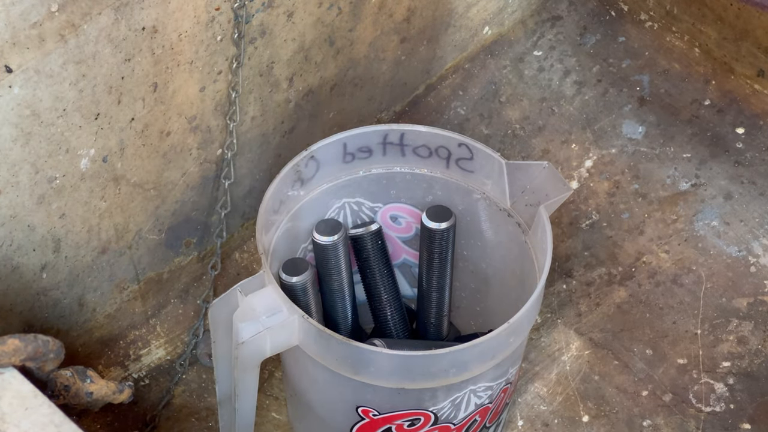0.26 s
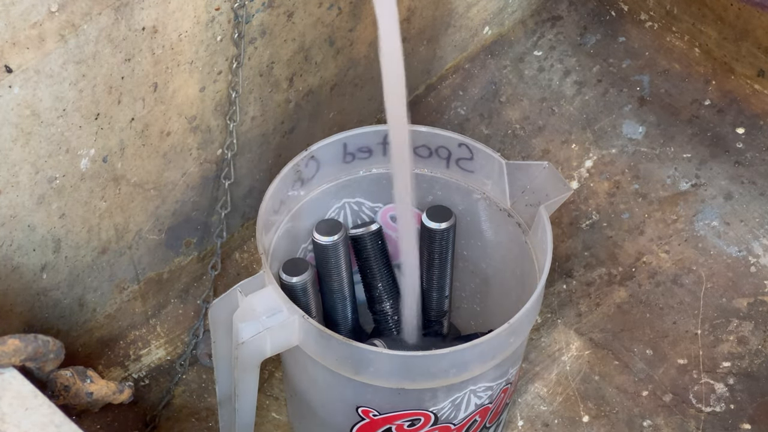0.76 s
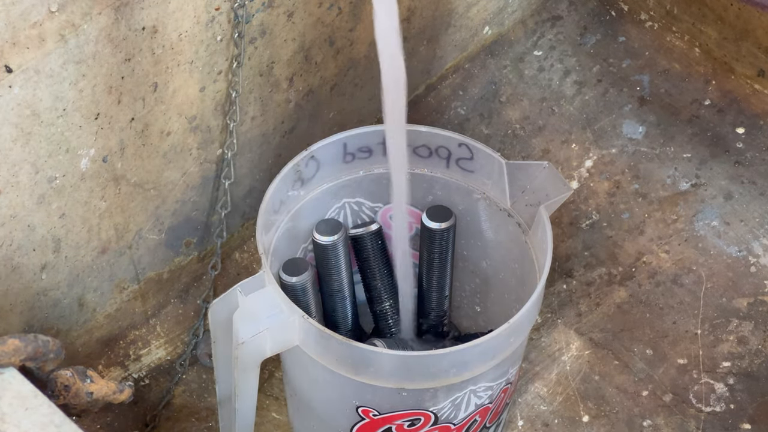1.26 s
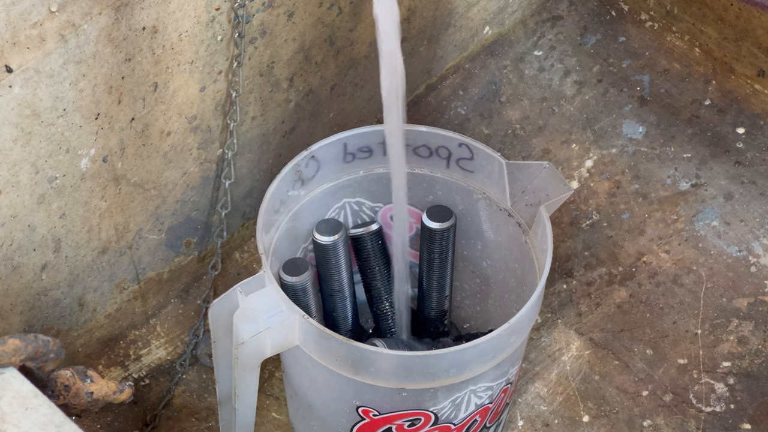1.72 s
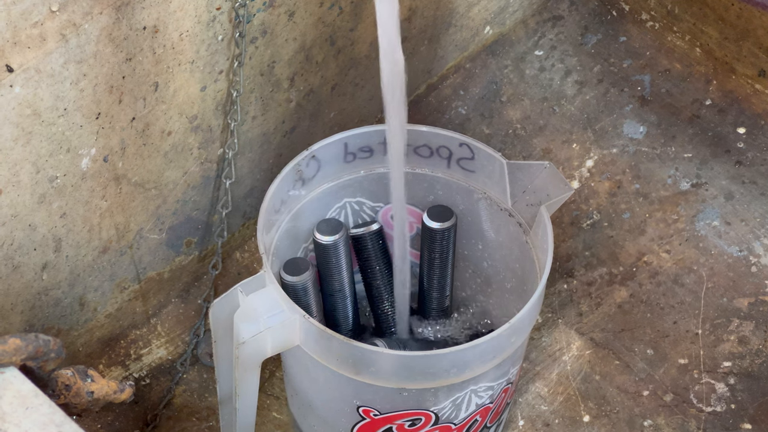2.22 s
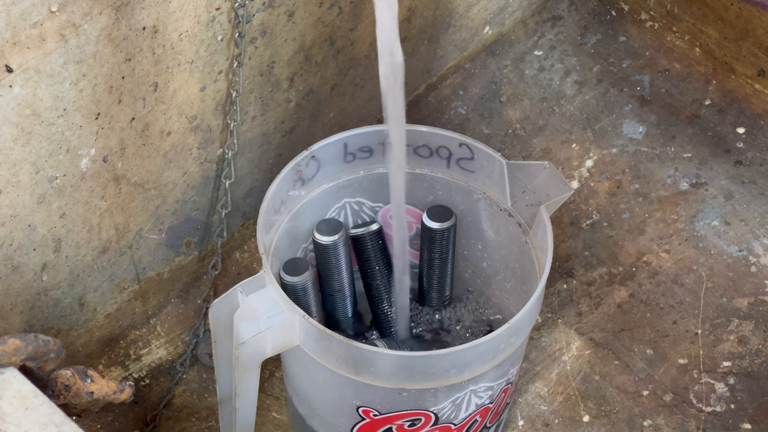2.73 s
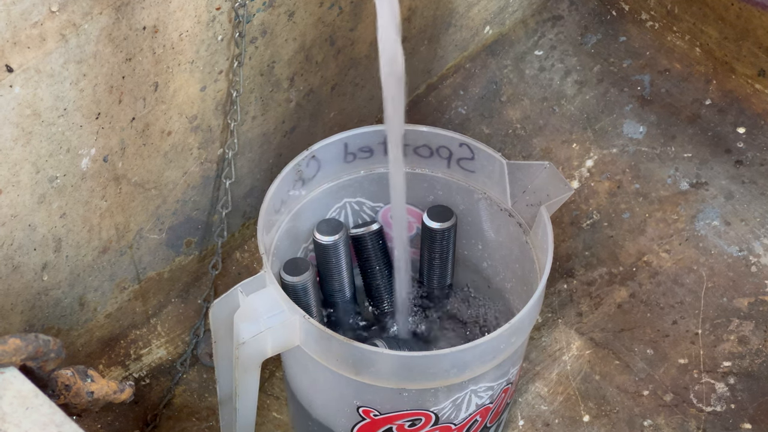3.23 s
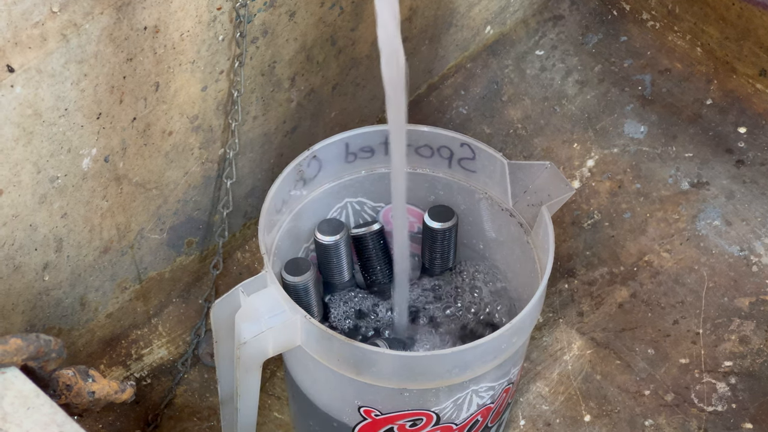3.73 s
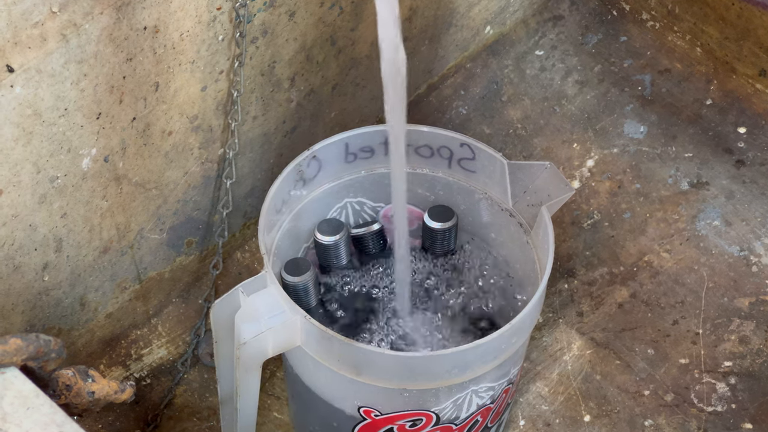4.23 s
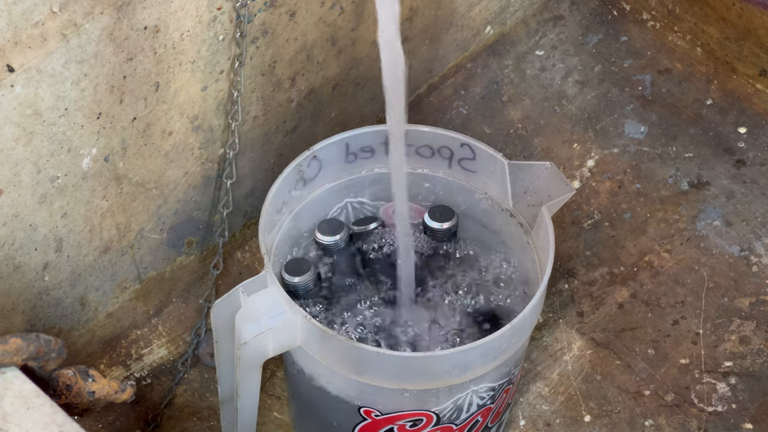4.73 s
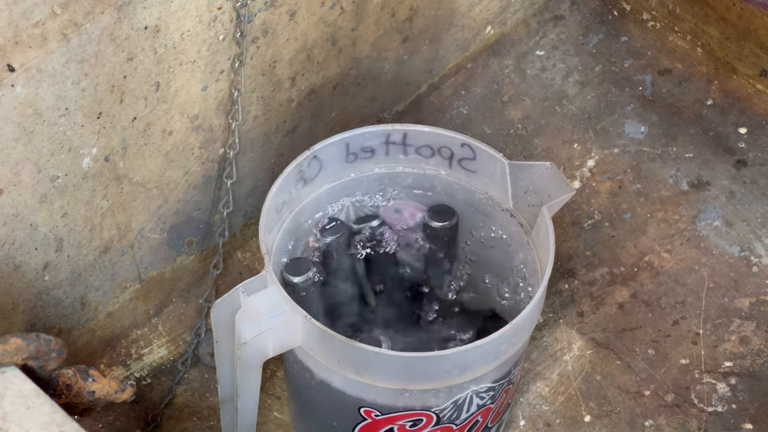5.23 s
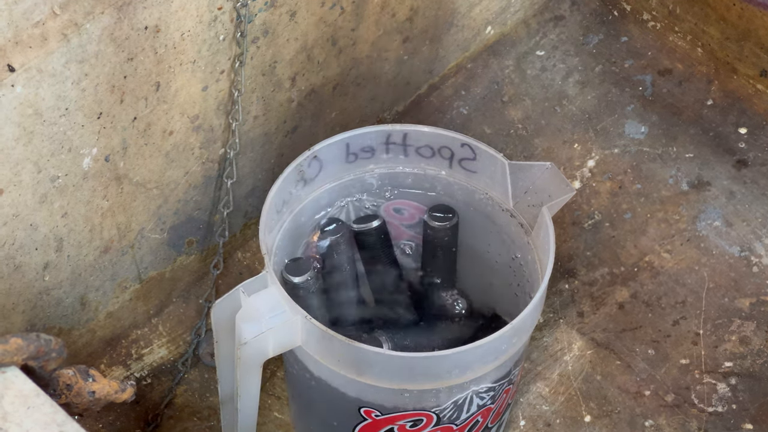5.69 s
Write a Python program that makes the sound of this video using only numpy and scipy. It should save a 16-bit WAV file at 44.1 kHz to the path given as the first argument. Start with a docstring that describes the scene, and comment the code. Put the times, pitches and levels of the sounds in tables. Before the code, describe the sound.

Quiet room noise and a faint low hum sit underneath throughout. A light rustle and soft low pipe thuds come first, at 0.1 and 0.2 s. At about 0.26 s air squeals through the valve, jumping up then sliding down around 2 to 2.7 kHz, chopped by arriving water; wet sputtering coughs follow until about 0.75 s. A thin aerated jet hisses and spatters on studs and plastic until nearly 2 s, with a low pipe rumble and a few plinks. Then a smooth stream takes over, shallow and bright at first, deepening around 2.8 s into gulping, bubbling, hollow pitcher resonance that swells, with small splashes near 3.5 to 3.8 s and a surge at 4.87 s. At 5.04 s the tap shuts with a ringing knock; the water dies quickly, with tiny drips until 5.2 s. Soft rustles, ticks and dull handling bumps follow, strongest around 5.9 s. Close mono microphone, little deep bass.

```python
"""A faint rustle and soft thuds in the pipe come first, as a tap opens over a plastic pitcher of steel studs.
Trapped air squeals and sputters out (tones and noise), then an aerated jet hisses on the bottom.
A smooth stream follows: drop impacts and tiny bubbles, passed through the resonances of the pitcher.
The tap shuts with a knock, a click that rings the pipe. Last drips, a few rustles and dull
handling bumps follow, over quiet room noise and a faint hum."""
import sys
import numpy as np
from scipy import signal
from scipy.fft import rfft, irfft, next_fast_len
from scipy.io import wavfile
from scipy.ndimage import uniform_filter1d

SR = 44100
rng = np.random.default_rng(int(sys.argv[2]) if len(sys.argv) > 2 else 0)


def dump(signal):
    """Clip the signal to [-1, 1] and save it as 16-bit WAV at the path in sys.argv[1]."""
    limited = np.clip(np.atleast_2d(signal).T, -1, 1)
    pcm = np.round(limited * 32767).astype(np.int16)
    wavfile.write(sys.argv[1], SR, pcm)


N = 262836
TIME = np.arange(N) / SR   # seconds


def from_db(db):
    """Turn decibels into a gain."""
    return 10 ** (np.asarray(db) / 20)


def rms_one(x):
    """Scale a sound to an rms (average strength) of 1."""
    return x / np.sqrt(np.mean(x ** 2) + 1e-20)


def in_time(rows):
    """Draw straight lines between the rows of a curve, giving each column at every sample."""
    s, *columns = np.transpose(rows)
    return [np.interp(TIME, s, c) for c in columns]


def between(start, stop, fade):
    """A gate that opens and closes with soft ends."""
    opening = np.clip((TIME - start) / fade, 0, 1)
    closing = np.clip((stop - TIME) / fade, 0, 1)
    return opening * closing


def passing(s, width_s):
    """A smooth step from 0 to 1 around a moment."""
    return .5 + .5 * np.tanh((TIME - s) / width_s)


def dying(age, t60):
    """Exponential decay that falls by 60 dB in t60 seconds."""
    return np.exp(-np.log(1000) * age / t60)


def fading(start, t60):
    """Full level until a moment, then an exponential decay."""
    return dying(np.maximum(TIME - start, 0), t60)


def since(s):
    """Sample numbers and ages in seconds for the quarter second after a moment."""
    at = np.arange(round(s * SR), min(N, round(s * SR) + SR // 4))
    return at, (at - at[0]) / SR


def bursts(rows, rise):
    """Envelope of quick swells that die away; overlapping ones add in power."""
    power = np.zeros(N)
    for s, db, t60 in rows:
        at, age = since(s)
        swell = 1 - np.exp(-age / rise)
        power[at] += (from_db(db) * swell * dying(age, t60)) ** 2
    return np.sqrt(power)


def drift(rate):
    """Slow random wandering with a spread of 1; rate is in Hz."""
    r = np.exp(-2 * np.pi * rate / SR)
    noise = rng.standard_normal(N + SR)
    return rms_one(signal.lfilter([1], [1, -2 * r, r * r], noise)[SR:])   # skip the first second to settle


def band(x, low_hz, high_hz):
    """Keep only the frequencies between two limits."""
    sos = signal.butter(3, [low_hz, min(high_hz, .49 * SR)], "band", fs=SR, output="sos")
    return signal.sosfilt(sos, x)


def zone(x, low_hz, high_hz):
    """One band of a sound, with its slow level held at 1."""
    x = band(x, low_hz, high_hz)
    slow_power = uniform_filter1d(x * x, SR // 5)
    return x / np.sqrt(slow_power + 1e-20)


def colour(x, spectrum):
    """Shape a sound to a spectrum with a minimum-phase filter (no pre-echo) of unit power gain."""
    size = next_fast_len(N + SR // 2) * 2
    hz, db = np.transpose(spectrum)
    log_hz = np.log(np.fft.rfftfreq(size, 1 / SR) + 1)
    gain = rms_one(from_db(np.interp(log_hz, np.log(hz), db)))
    # folding the cepstrum gives the phase that belongs to this gain
    cepstrum = irfft(np.log(gain))[:size // 2]
    cepstrum[1:] *= 2
    return irfft(rfft(x, size) * np.exp(rfft(cepstrum, size)))[:N]


def resound(x, peaks):
    """Each resonance lifts its own narrow band, or lowers it if the boost is negative."""
    for hz, width, db in peaks:
        narrow = signal.lfilter(*signal.iirpeak(hz, hz / width, fs=SR), x)
        x = x + (from_db(db) - 1) * narrow
    return x


def ring(clicks, hz, t60):
    """A unit click sets a sine of height 1 ringing, and it dies away."""
    r, w = from_db(-60 / (t60 * SR)), 2 * np.pi * hz / SR
    return signal.lfilter([0, np.sin(w)], [1, -2 * r * np.cos(w), r * r], clicks + 1e-18)


def pulses(rows, glide, swell):
    """Damped tones that swell over a share of a cycle and glide in pitch as they die."""
    out = np.zeros(N)
    for s, db, hz, t60 in rows:
        at, age = since(s)
        pitch = hz * (1 + glide * np.minimum(age / t60, 1))
        phase = 2 * np.pi * np.cumsum(pitch) / SR
        shape = (1 - np.exp(-age * hz / swell)) * dying(age, t60)
        out[at] += from_db(db) * shape / shape.max() * np.sin(phase)
    return out


def whistle(hz, width_hz, rough):
    """An unsteady tone: a steady core with narrow noise around it."""
    wobble = 1 + rough * (drift(width_hz) + 1j * drift(width_hz))
    turning = np.exp(2j * np.pi * np.cumsum(hz) / SR)
    return rms_one(np.real(wobble * turning))


def grains(per_s, spread_db):
    """Random impacts of uneven size."""
    sizes = from_db(spread_db * np.minimum(rng.exponential(1, N), 4)) * rng.choice([-1, 1], N)
    return rms_one(sizes * (rng.random(N) < per_s / SR))


def water(per_s, spread_db, cycles, bubble_db, count=28):
    """Drop impacts plus tiny ringing bubbles of many sizes, each ringing for a set number of cycles."""
    births = grains(per_s, spread_db)
    dealt = rng.integers(0, count, N)   # which bubble size each birth gets
    bubbles = 0
    for k, hz in enumerate(np.geomspace(400, 15000, count)):
        ringing = ring(births * (dealt == k), hz, cycles / hz)
        bubbles = bubbles + np.sqrt(hz) * rms_one(np.diff(ringing, prepend=0))
    return rms_one(grains(2 * per_s, spread_db) + from_db(bubble_db) * rms_one(bubbles))


def among_studs(x, echo_db, wander):
    """Three short reflections shift with the moving surface."""
    n, direct = np.arange(N), x
    for k, lag_s in enumerate([.0011, .0019, .0031]):
        delayed = np.interp(n - lag_s * SR * (1 + wander * drift(0.57)), n, direct)
        x = x + (-1) ** k * from_db(echo_db) * delayed
    return x


# Colour of the falling stream. Each row: frequency in Hz, relative level in dB.
POUR_SPECTRUM = [(150, -55), (250, -14.5), (436, -2), (557, 3), (816, -19.5), (1380, -3.5), (1550, 2),
                 (1760, -7), (2530, 0.5), (3460, 1.5), (4990, -4), (6140, -1.5), (9330, -4.5),
                 (13000, -2.5), (16000, 3)]
# Air resonances of the pitcher. Each row: frequency in Hz, width in Hz, boost in dB.
PITCHER_RESONANCES = [(399, 9.1, 12.5), (535, 77, 8.5), (909, 78, 15.5), (1572, 75, 8.5), (2260, 81, -4),
                      (3520, 250, 1.5), (4000, 210, 3), (4640, 53, 6.5), (5400, 230, 4.5), (6195, 310, 7),
                      (7050, 59, 10), (7910, 81, 7), (12500, 230, 4.5), (13660, 280, 8), (13500, 320, -10)]
# A thin layer of water holds few mid-sized bubbles. Each row: frequency in Hz, width in Hz, boost in dB.
SHALLOW_DIPS = [(1050, 500, -3), (3123, 2800, -14)]
# Voices of the smooth stream. Each row: low edge in Hz, high edge in Hz, level in shallow water in dB,
# gain in the pool in dB, rise with filling in dB per second, strength of the gulping in dB.
STREAM_VOICES = [(310, 680, -84, 7, 4.5, 2.5), (840, 2000, -73, 3, 2, 3.5),
                 (2300, 6780, -61.5, 4.5, 0.69, 2), (6650, 15100, -56, 3, -1.5, 0.24)]
POUR_START_S, POUR_STOP_S, POUR_T60_S = 1.95, 5.025, 0.32
COVERED_S = 2.5   # water covers the bottom
DEEP_S, DEEPEN_S = 2.85, 0.35   # around this moment the stream begins to plunge into a pool
# the water churns as it closes over the studs, this many gulps strong
SURGE_S, SURGE_HALF_S, SURGE_GULPS = 4.87, 0.063, 1.6


def pour():
    """The stream plunges in uneven gulps; its bubbles ring the pitcher, and all but the top voice grow."""
    pool = passing(DEEP_S, DEEPEN_S)
    depth = 0.18 + 0.87 * pool   # deeper water gulps and crackles more
    crackle = from_db(-5.0) * depth * water(1100, 3.1, cycles=24, bubble_db=1.5)
    drops = water(9000, 3.6, cycles=13.6, bubble_db=-2.0) + crackle
    sound = resound(colour(drops, POUR_SPECTRUM), PITCHER_RESONANCES)
    shallow = 1 - passing(COVERED_S, .05)
    sound = sound + shallow * (resound(sound, SHALLOW_DIPS) - sound)
    sound = among_studs(sound, echo_db=-19, wander=0.055)
    filled_s = np.clip(TIME, POUR_START_S, POUR_STOP_S) - POUR_START_S
    surge = SURGE_GULPS * np.exp(-((TIME - SURGE_S) / SURGE_HALF_S) ** 2)
    gulps = drift(45) * depth + surge
    voices = 0
    for low, high, db, pool_db, rise, gulp_db in STREAM_VOICES:
        level = from_db(db + pool_db * pool + rise * filled_s + gulp_db * gulps)
        voices = voices + level * zone(sound, low, high)
    return voices * passing(POUR_START_S, 0.011) * fading(POUR_STOP_S, POUR_T60_S)


# Water strikes a stud and throws drops. Each row: start in seconds, relative peak in dB, t60 in seconds.
STUD_SPLASHES = [(2.553, -41, .1), (2.775, -44, .04), (3.12, -43, .06), (3.52, -28, 0.051),
                 (3.635, -29, 0.11), (3.81, -28.5, 0.044), (4.012, -36, 0.048), (4.8264, -33, .04),
                 (4.8479, -35, 0.07), (5.0735, -14.5, 0.015), (5.085, -33.5, .015), (5.113, -34, 0.023)]


def splashes():
    """Now and then the stream strikes a stud and throws a cluster of drops."""
    drops = bursts(STUD_SPLASHES, rise=0.0017) * water(6000, 2.2, cycles=12, bubble_db=4)
    return from_db(-17) * resound(colour(drops, POUR_SPECTRUM), PITCHER_RESONANCES)


# Gaps between the studs resound in turn.
# Each row: middle in seconds, half length in seconds, frequency in Hz, boost in dB.
STUD_GAPS = [(.9, .13, 1830, 1.5), (1.365, 0.077, 3190, 8), (1.703, 0.45, 10850, 6.5),
             (1.856, 0.33, 2910, 7.5), (2.592, 0.077, 5400, 8.5), (3.1, .2, 2605, 14),
             (3.984, 0.26, 12900, 4), (4.03, 0.58, 11150, 4.5), (4.749, 0.19, 4800, 5),
             (4.87, .45, 3610, 6), (4.92, 0.22, 8550, 11.5)]
GAP_Q = 11   # sharpness: frequency divided by width


def through_gaps(x):
    """Each gap between the studs swells and fades as the water passes it."""
    for s, half_length, hz, db in STUD_GAPS:
        presence = np.exp(-((TIME - s) / half_length) ** 2)
        x = x + presence * (resound(x, [(hz, hz / GAP_Q, db)]) - x)
    return x


# Slugs of water coughed out. Each row: start in seconds, relative peak in dB.
COUGH_TIMES = [(0.351, -26), (0.383, -23.5), (.394, -33.5), (.414, -33.5), (.432, -28.5), (0.452, -25),
               (.497, -33), (0.531, -29.5), (0.546, -26.5), (0.576, -23.5), (0.607, -28), (0.661, -31),
               (0.731, -34.5), (1.018, -44.5)]
COUGH_T60_S = 0.1


def slugs():
    """Strength of the slugs of water leaving the spout."""
    return bursts([(s, db, COUGH_T60_S) for s, db in COUGH_TIMES], rise=0.0013)


# Colour of the jet's hiss. Each row: frequency in Hz, relative level in dB.
JET_SPECTRUM = [(150, -35.5), (250, -11), (313, -19.5), (380, -2.5), (436, -10), (674, -12.5), (906, -13),
                (1470, -2.5), (2400, -7), (3230, 1), (6140, -1.5), (12300, -9), (14900, -1.5), (16000, -9)]
# Resonances in the hiss. Each row: frequency in Hz, width in Hz, boost in dB.
JET_RESONANCES = [(363.5, 20, 0.5), (1060, 60, 9), (1980, 86, 6.5), (15100, 900, 1.5)]
# Strength of the aerated jet's hiss, before the shares below. Each row: time in seconds, level in dB.
JET_STRENGTH = [(0.66, -41.5), (0.72, -40.5), (0.95, -50), (1.19, -46), (1.324, -47), (1.54, -52),
                (1.888, -48), (1.95, -48)]
JET_START_S, JET_STOP_S = 0.332, 1.972
JET_FULL_S, JET_BUILD_S = 0.56, 0.06   # the hiss builds while the tap is still coughing
COUGH_SPRAY_DB = -16   # relative to the slugs
SPATTER_DB, SPRAY_DB = -4, -3.5   # relative to the strength of the hiss
SPLASH_DB, FIRST_SPLASH_DB, SPLASH_T60_S = -59.5, -43.5, 1.32   # the low splash starts heavy, then settles


def jet():
    """Aerated water sprays on studs and plastic, and stops abruptly when the air is gone."""
    hiss = water(16000, 3.4, cycles=24, bubble_db=-1.5)
    hiss = resound(colour(hiss, JET_SPECTRUM), JET_RESONANCES)
    hiss = among_studs(hiss, echo_db=-20, wander=0.028)
    steady = from_db(in_time(JET_STRENGTH)[0]) * passing(JET_FULL_S, JET_BUILD_S)
    force = np.hypot(steady, from_db(COUGH_SPRAY_DB) * slugs())
    weight = from_db(SPLASH_DB) + from_db(FIRST_SPLASH_DB) * fading(JET_START_S, SPLASH_T60_S)
    splash = weight * from_db(1.5 * drift(45)) * zone(hiss, 200, 2080)
    spatter = force * from_db(SPATTER_DB + 1.4 * drift(41)) * zone(hiss, 2200, 8600)
    spray = force * from_db(SPRAY_DB + 0.36 * drift(32)) * zone(hiss, 8800, 17000)
    return (splash + spatter + spray) * between(JET_START_S, JET_STOP_S, .025)


# Colour of the rushing air. Each row: frequency in Hz, relative level in dB.
RUSH_SPECTRUM = [(240, -83), (400, -32), (1060, -21), (1460, -15), (2550, -9), (3120, -6.5), (5350, -14),
                 (6540, -11.5), (14600, -20), (16000, -18)]
# Resonances of the spout. Each row: frequency in Hz, width in Hz, boost in dB.
SPOUT_RESONANCES = [(1064, 190, 10), (1768, 41, 7.5), (1956, 32, 12.5), (2130, 9, 5.5), (2490, 32, 13.5),
                    (2616, 40, 10.5), (2900, 12, 12.5), (4430, 25, 9), (5060, 30, 8), (5540, 60, 11)]
# Pitch of the air squealing through the valve. Each row: time in seconds, pitch in Hz.
SQUEAL_CURVE = [(.266, 1942), (.274, 2181), (.281, 2360), (.29, 2735), (.307, 2715), (.319, 2522),
                (.33, 2106), (.345, 1885)]
# Two puffs of air, the first dry, the second wet. Each row: start in seconds, attack in seconds,
# hold in seconds counted from the start, t60 in seconds, then the levels of fundamental, octave and rush in dB.
AIR_PUFFS = [(.264, .013, 0.036, .08, -34, -24, -32.5), (0.304, 0.0081, .024, .17, -23.5, -46, -30)]
CHOP_S, CHOP_HZ, CHOP_GROW_S = .312, 255, 0.024   # water reaches the valve and chops the air
WET_CUT_HZ = 7000   # water in the spout dulls the rush


def spurt():
    """Air squeals through the valve in two puffs; arriving water chops it, dulls it and pulls the pitch down."""
    hz, = in_time(SQUEAL_CURVE)
    first = whistle(hz, width_hz=300, rough=.45)
    octave = whistle(2 * hz, width_hz=300, rough=.45)
    rush = resound(colour(grains(12000, 1.3), RUSH_SPECTRUM), SPOUT_RESONANCES)
    wet = np.clip((TIME - CHOP_S) / CHOP_GROW_S, 0, 1)
    dull = signal.sosfilt(signal.butter(1, WET_CUT_HZ, fs=SR, output="sos"), rush)
    rush = (1 - wet) * rush + wet * dull
    air = 0
    for s, attack, hold, t60, first_db, octave_db, rush_db in AIR_PUFFS:
        force = np.clip((TIME - s) / attack, 0, 1) * fading(s + hold, t60)
        squeal = from_db(first_db) * first + from_db(octave_db) * octave
        air = air + force ** 2 * squeal + force * from_db(rush_db) * rush   # squeal needs a strong flow
    chop_phase = 2 * np.pi * np.cumsum(CHOP_HZ * (1 + .15 * drift(60))) / SR
    return air * (1 + .7 * wet * np.cos(chop_phase))


# Colour of the coughs. Each row: frequency in Hz, relative level in dB.
COUGH_SPECTRUM = [(59, -65), (100, -19), (164, -8), (305, -26.5), (383, -17.5), (684, -2), (1080, -10.5),
                  (1270, -29), (1380, -1), (2570, -7), (3730, -12), (12100, -26), (14000, -13)]


def coughs():
    """Slugs of water and air burst out as grains of noise and make the spout resound."""
    noise = from_db(-9.5) * colour(slugs() * grains(7000, 1.4), COUGH_SPECTRUM)
    return resound(noise, SPOUT_RESONANCES)


# The pipe as the valve shuts. Each row: frequency in Hz, relative level in dB, t60 in seconds.
PIPE_RINGS = [(282, -12, .04), (411, -2, .035), (492, 0, .045), (597, 0, .04), (884, -5, .045),
              (1100, -6, .039), (1500, -10, .025), (1960, -10, .02), (2400, -7, .02), (2900, -9, .03)]
KNOCK_S, KNOCK_DB = 5.0368, -31.5


def knock():
    """The valve shuts: a blow sets the pipe ringing, with a brief rattle."""
    at, _ = since(KNOCK_S)
    blow = np.zeros(N)
    blow[at[0]] = 1
    rings = sum((-1) ** k * from_db(db) * ring(blow, hz, t60) for k, (hz, db, t60) in enumerate(PIPE_RINGS))
    noise = rms_one(band(rng.standard_normal(N), 440, 3600))
    rattle = bursts([(KNOCK_S, -11, .06)], rise=0.00045) * noise
    return from_db(KNOCK_DB) * (rings + rattle)


# Single bubbles and drips. Each row: start in seconds, peak in dB, starting pitch in Hz.
BUBBLES_AND_DRIPS = [(.876, -41, 3260), (1.023, -50, 710), (1.317, -38.5, 3150), (1.436, -39.5, 1450),
                     (1.466, -39, 3520), (3.034, -41.5, 6050), (4.02, -40, 9400), (4.774, -32.5, 4440),
                     (4.827, -38, 3340), (5.074, -41.5, 4520), (5.117, -48, 4460), (5.123, -51, 5060),
                     (5.131, -42, 3980), (5.151, -45, 7340), (5.156, -41, 9040), (5.169, -52, 11200),
                     (5.175, -42, 8250)]
PLINK_T60_S, PLINK_SHORTENS = 0.044, 0.84   # ring time at 1 kHz; it falls with this power of the pitch
DRIP_SPLASH_DB, DRIP_SPLASH_T60_S = -9, 0.022   # level relative to the ring


def drips():
    """A drop lands with a tiny splash; its bubble rings and rises in pitch, small ones dying sooner."""
    rows = [(s, db, hz, PLINK_T60_S * (1000 / hz) ** PLINK_SHORTENS) for s, db, hz in BUBBLES_AND_DRIPS]
    rings = pulses(rows, glide=.1, swell=1.5)
    landings = bursts([(s, db, DRIP_SPLASH_T60_S) for s, db, hz in BUBBLES_AND_DRIPS], rise=0.00026)
    spray = rms_one(band(grains(6000, 5.4), 2750, 11000))
    return rings + from_db(DRIP_SPLASH_DB) * landings * spray


def basin(x, t60, wet_db):
    """The walls of the sink return a short, dense echo."""
    age = TIME[:SR // 2]
    echo = rng.standard_normal(len(age)) * dying(age, t60) * (age > .002)
    return x + from_db(wet_db) * signal.fftconvolve(x, echo / np.linalg.norm(echo))[:N]


# Dull handling bumps. Each row: start in seconds, peak in dB before filtering, starting pitch in Hz.
HANDLING_BUMPS = [(4.614, -55, 255), (4.68, -38.5, 265), (4.70, -50, 219), (5.257, -53.5, 290),
                  (5.306, -50.5, 297), (5.321, -39, 456), (5.352, -40, 485), (5.361, -44, 231),
                  (5.373, -41.5, 300), (5.64, -44.5, 464), (5.662, -36, 432), (5.793, -42.5, 433),
                  (5.828, -38.5, 347), (5.869, -45, 383), (5.897, -38, 482), (5.904, -27, 363),
                  (5.915, -26.5, 410), (5.931, -26.5, 541), (5.945, -32.5, 330)]
# Light rustles and ticks. Each row: start in seconds, relative peak in dB, t60 in seconds.
RUSTLES_AND_TICKS = [(0, -65, 0.35), (.2, -65.5, 0.68), (5.499, -51, .3), (5.513, -45, .048),
                     (5.645, -44.5, .11), (5.687, -56.5, 1), (5.738, -38, 0.0059), (5.774, -46, .012),
                     (5.790, -51.5, 0.28), (5.801, -31, 0.012), (5.825, -48.5, 0.13)]
# Colour of the rustles. Each row: frequency in Hz, relative level in dB.
RUSTLE_SPECTRUM = [(350, -24), (600, -13.5), (1330, -6.5), (1470, -13.5), (2500, -11), (3580, -7.5),
                   (4280, -12.5), (8160, -18), (16000, -24.5)]
BUMP_T60_S, RUB_S, RUB_DB = 0.011, 0.035, -6.5   # the rubbing is relative to the bumps nearby
HANDLING_RUMBLE_DB = -80


def handling():
    """Soft falling tones for bumps, with a little rubbing and rumbling noise, and brighter rustles."""
    bumps = pulses([(s, db, hz, BUMP_T60_S) for s, db, hz in HANDLING_BUMPS], glide=-0.15, swell=0.27)
    nearby = signal.windows.hann(int(2 * RUB_S * SR)) ** 2   # the rubbing surrounds each bump
    rub_level = np.sqrt(np.abs(signal.fftconvolve(bumps ** 2, nearby / nearby.sum(), "same")))
    rubbing = from_db(RUB_DB) * rub_level * rms_one(band(rng.standard_normal(N), 137, 600))
    rustles = bursts(RUSTLES_AND_TICKS, rise=0.00024) * grains(9000, 1.54)
    rustles = from_db(-3.5) * colour(rustles, RUSTLE_SPECTRUM)
    rumble = rms_one(band(rng.standard_normal(N), 90, 220))
    rumble = from_db(HANDLING_RUMBLE_DB) * passing(4.6, 0.09) * rumble
    return band(bumps, 95, 3500) + rubbing + rustles + rumble


# Soft thuds in the pipework as the tap opens. Each row: start in seconds, peak in dB, t60 in seconds.
PIPE_THUDS = [(0.102, -49.5, 0.11), (0.199, -51.5, 0.42), (0.581, -51, 0.11)]
THUD_HZ = 142   # starting pitch
RUMBLE_DB, OPENING_RUMBLE_DB, RUMBLE_T60_S = -75, -66.5, 0.97   # the pipe rumbles while air is in it


def pipework():
    """The pipe thuds in falling tones as the tap opens, and rumbles as low noise until the air is gone."""
    thuds = pulses([(s, db, THUD_HZ, t60) for s, db, t60 in PIPE_THUDS], glide=-0.43, swell=0.16)
    opening = from_db(OPENING_RUMBLE_DB) * passing(JET_START_S, .02) * fading(0.42, RUMBLE_T60_S)
    level = (from_db(RUMBLE_DB) + opening) * (1 - passing(JET_STOP_S, 0.013))
    return thuds + level * rms_one(band(rng.standard_normal(N), 49, 170))


# Colour of the room noise. Each row: frequency in Hz, relative level in dB.
ROOM_SPECTRUM = [(80, -12), (220, -7.5), (350, -5.5), (550, -3), (1100, -9), (1800, -11), (4000, -14),
                 (9000, -19.5), (16000, -23.5)]
FLOOR_DB, HUM_HZ, HUM_DB = -73.5, 237.6, -85


def background():
    """Steady coloured room noise and a faint, slightly unsteady hum."""
    hum = from_db(HUM_DB) * whistle(np.full(N, HUM_HZ), width_hz=2.2, rough=0.1)
    return hum + from_db(FLOOR_DB) * colour(rng.standard_normal(N), ROOM_SPECTRUM)


def scene():
    """All sources added together, heard in mono on both channels."""
    stream = through_gaps(jet() + pour()) + splashes()
    tap = basin(spurt() + coughs(), t60=.2, wet_db=-14)
    plinks_and_knock = basin(drips() + knock(), t60=0.055, wet_db=-6.5)
    mono = stream + tap + plinks_and_knock + handling() + pipework() + background()
    return np.array([mono, mono])


CUTOFF_HZ = 15900


def record(dry):
    """The small microphone loses deep bass; the top is cut steeply."""
    thin = signal.sosfilt(signal.butter(2, 55, "high", fs=SR, output="sos"), dry)
    return signal.sosfilt(signal.ellip(12, .1, 80, CUTOFF_HZ, fs=SR, output="sos"), thin)


dry = scene()
out = record(dry)
dump(out)
```